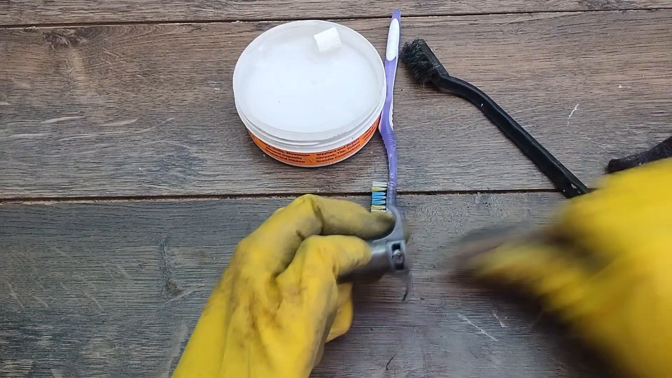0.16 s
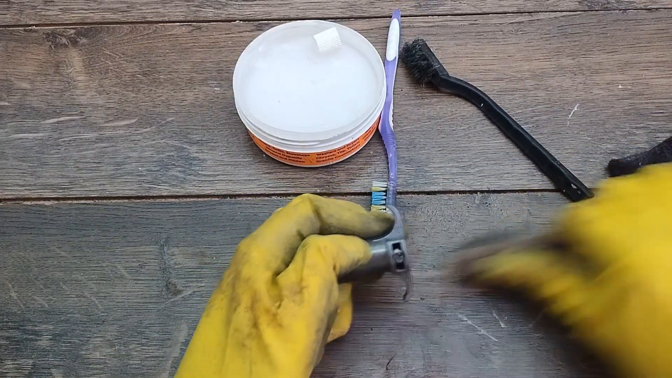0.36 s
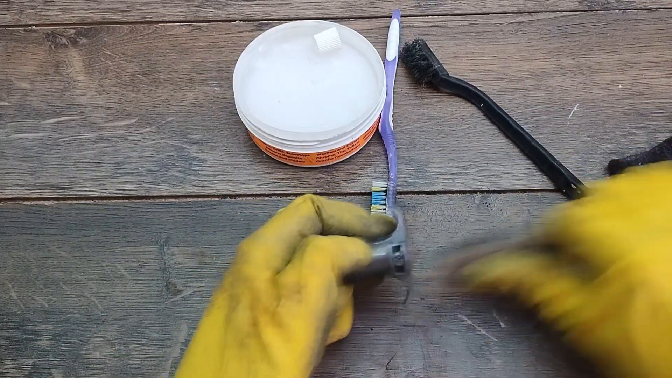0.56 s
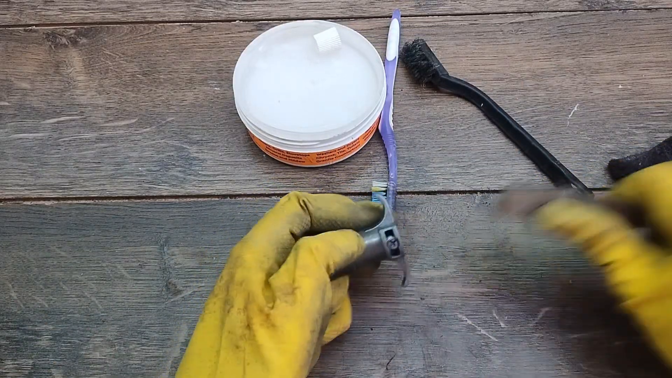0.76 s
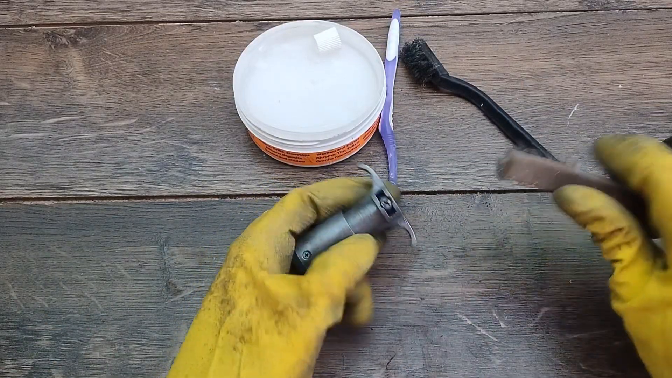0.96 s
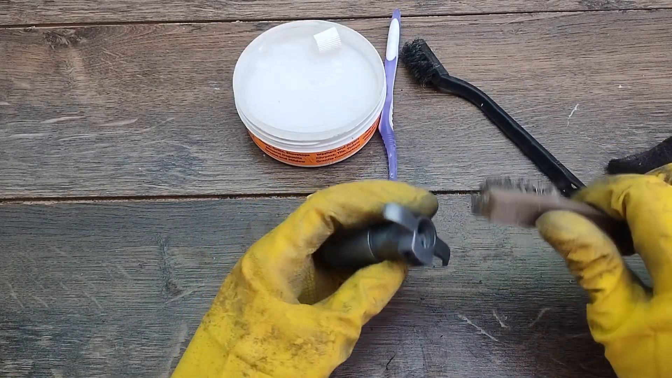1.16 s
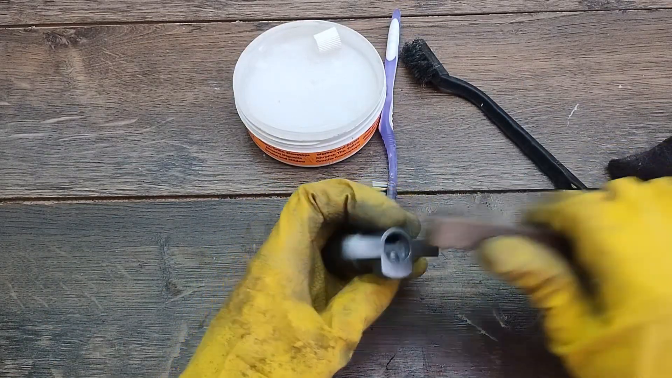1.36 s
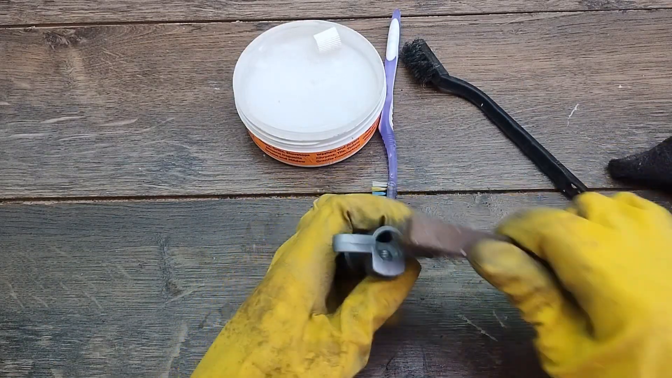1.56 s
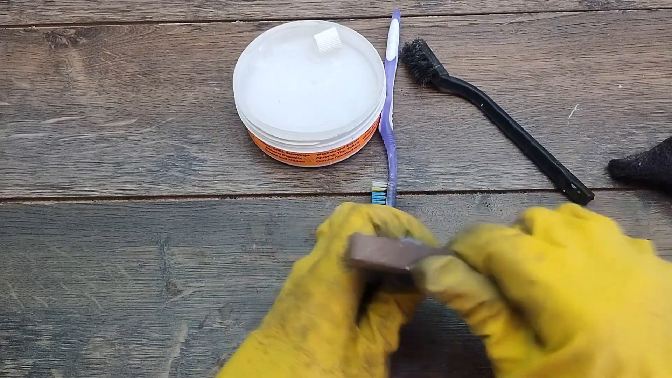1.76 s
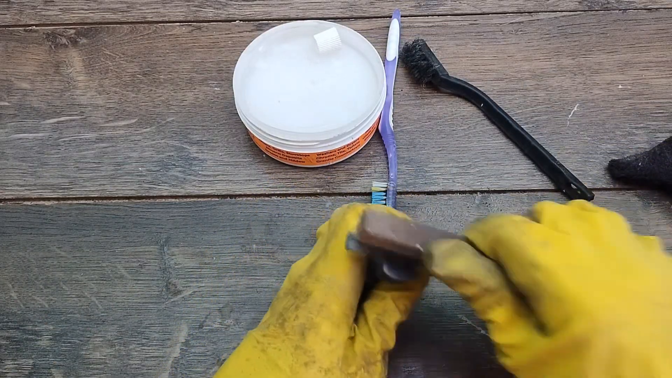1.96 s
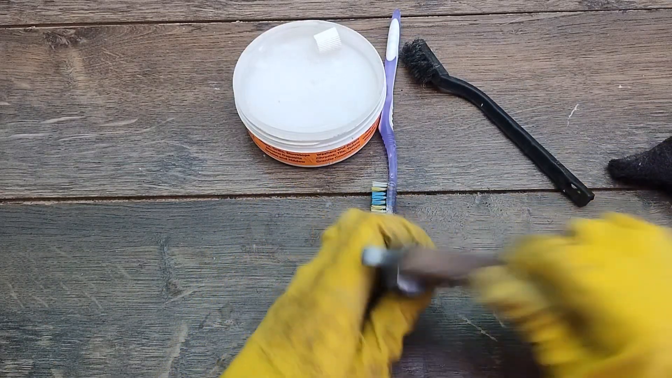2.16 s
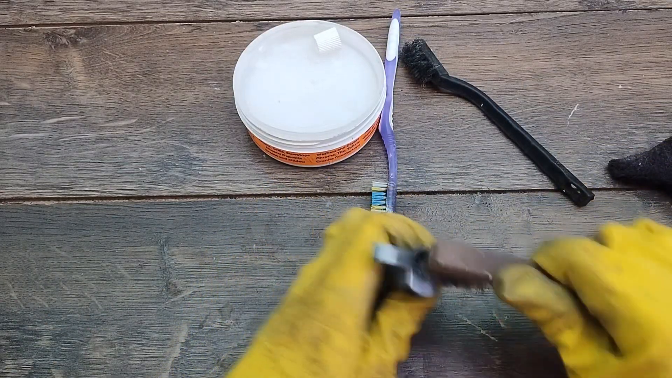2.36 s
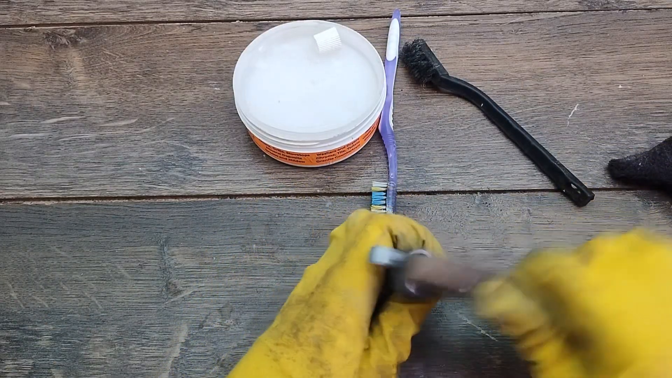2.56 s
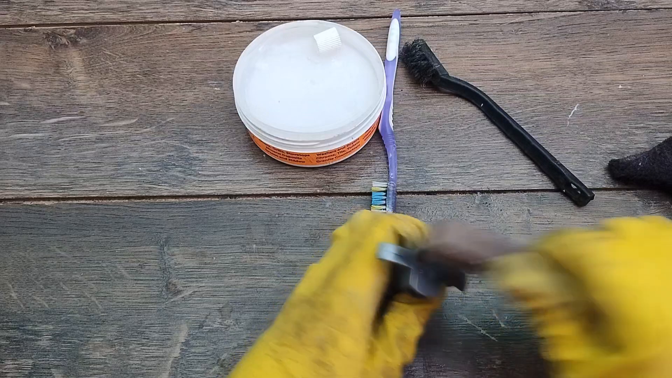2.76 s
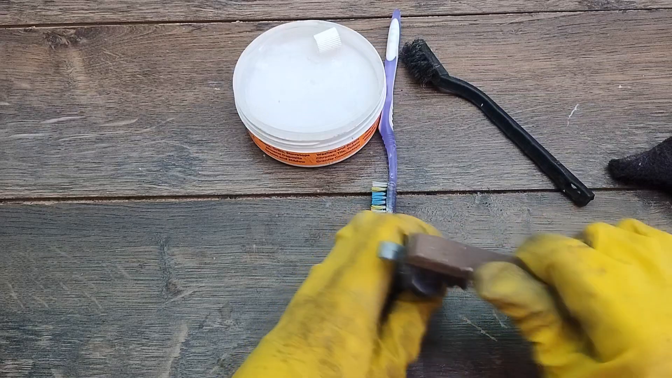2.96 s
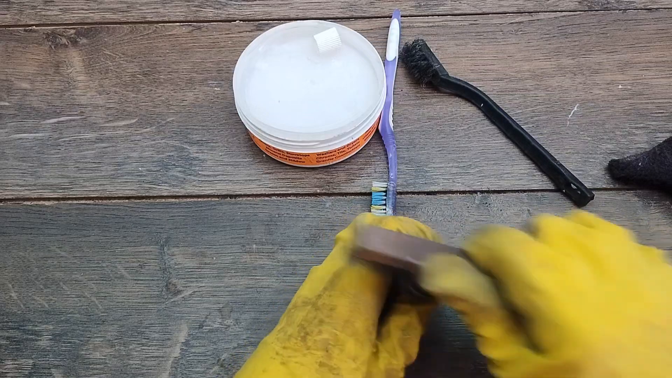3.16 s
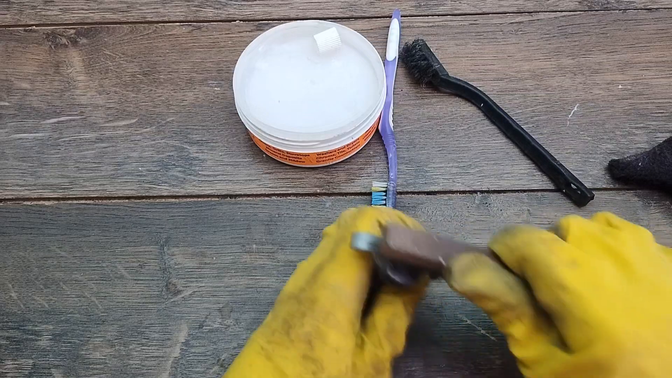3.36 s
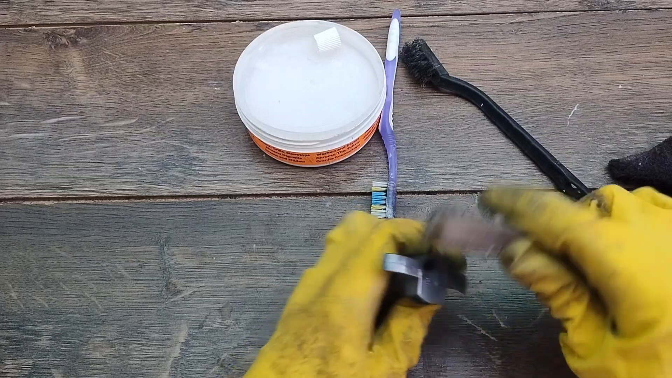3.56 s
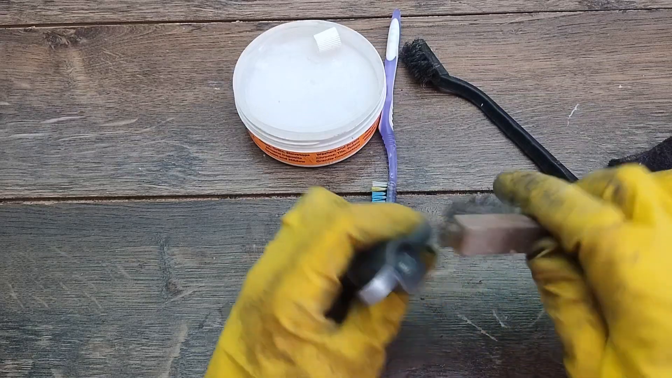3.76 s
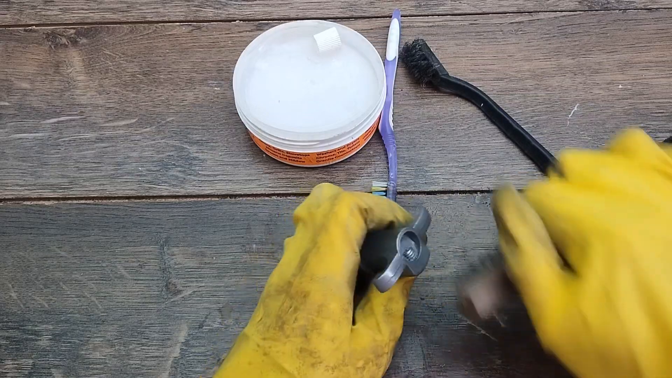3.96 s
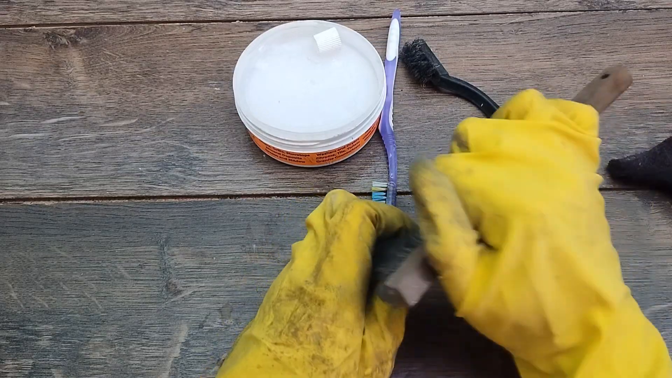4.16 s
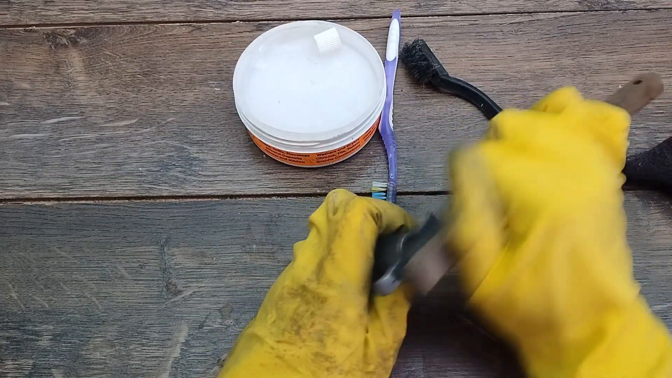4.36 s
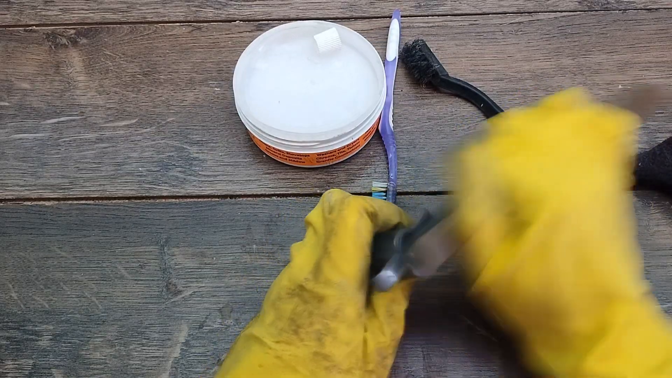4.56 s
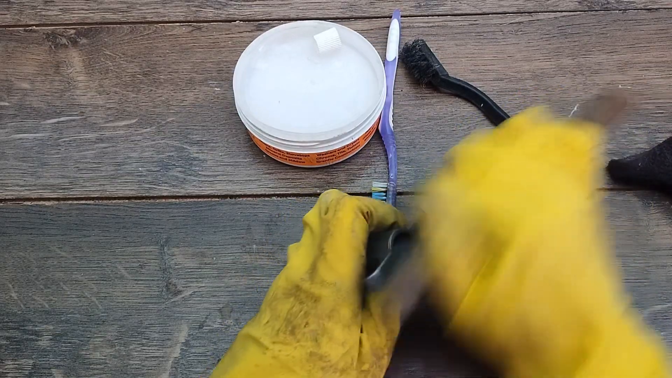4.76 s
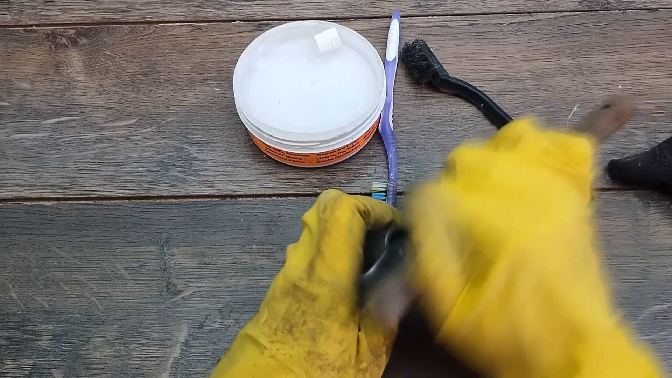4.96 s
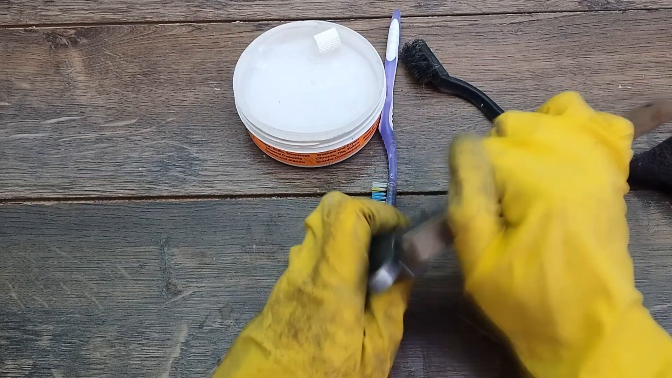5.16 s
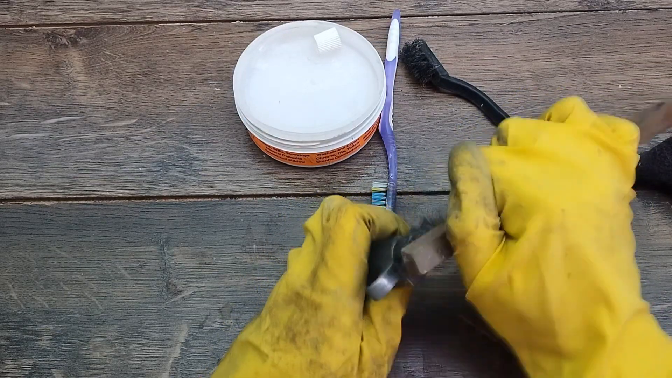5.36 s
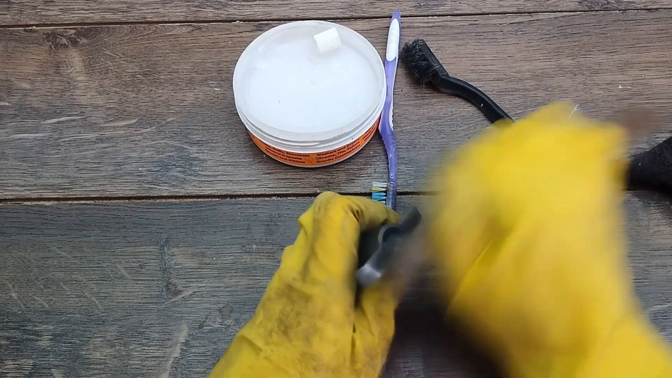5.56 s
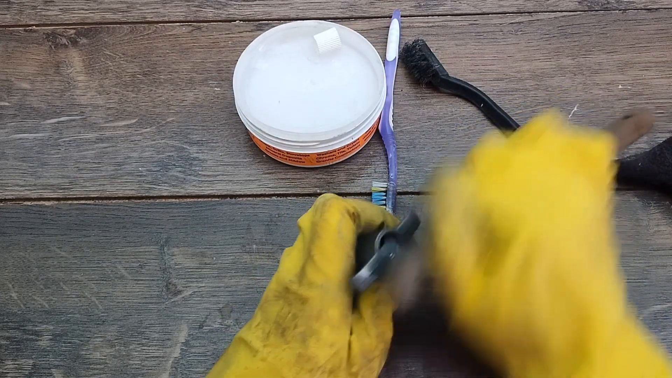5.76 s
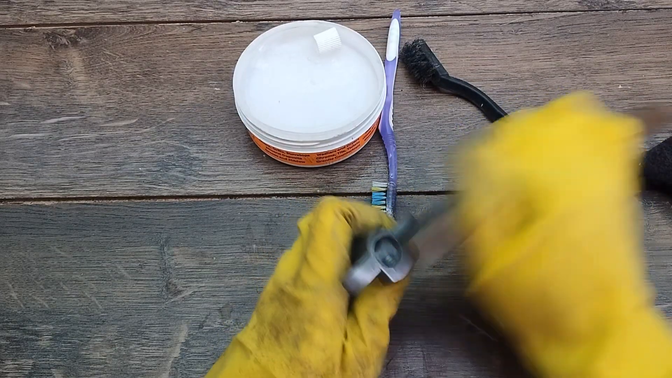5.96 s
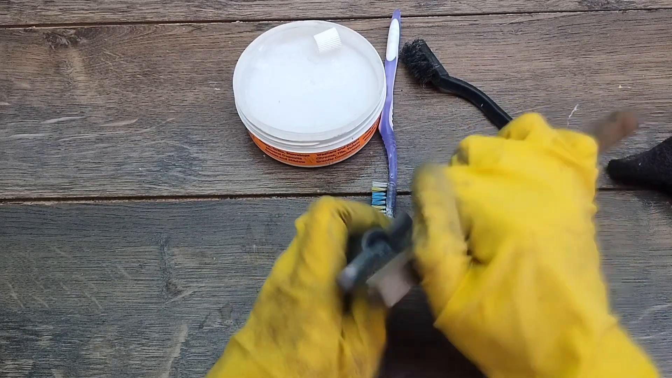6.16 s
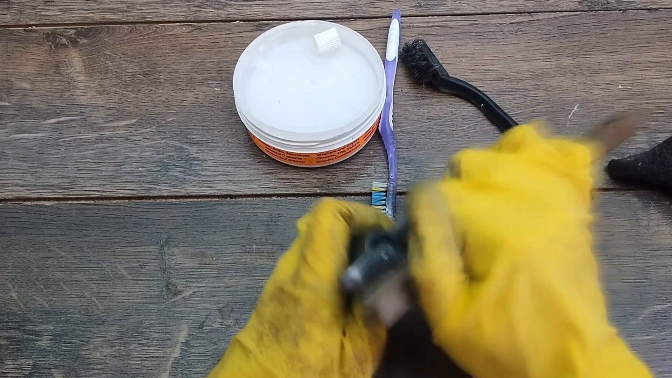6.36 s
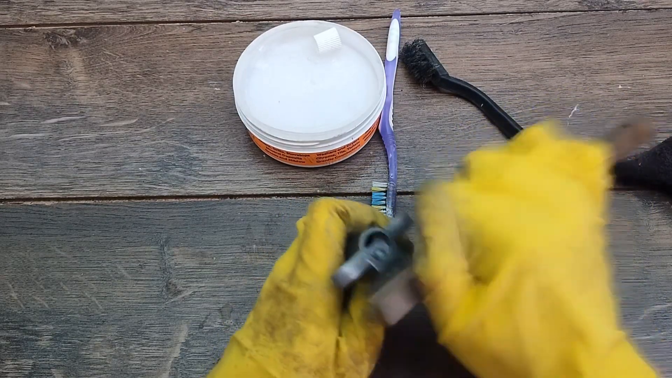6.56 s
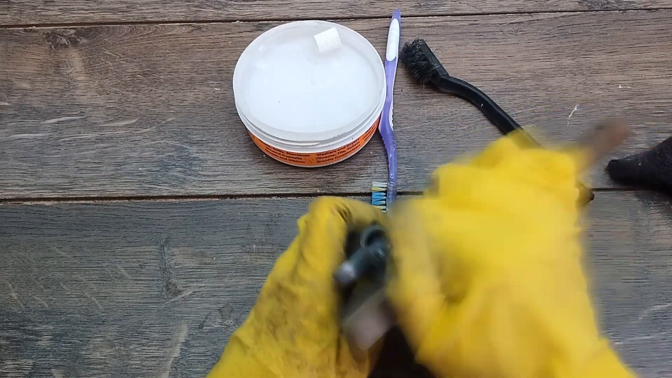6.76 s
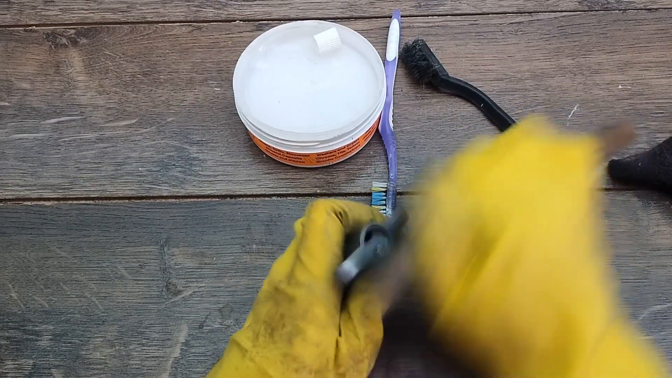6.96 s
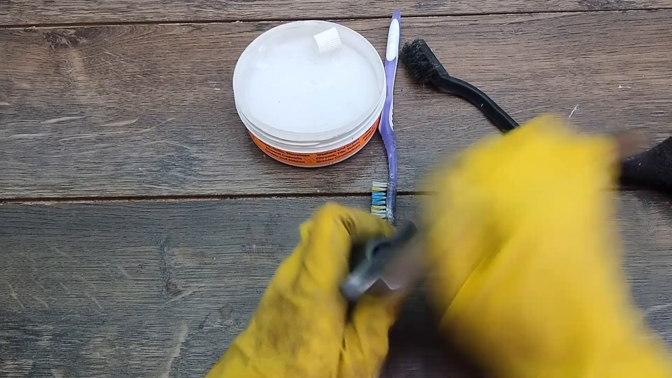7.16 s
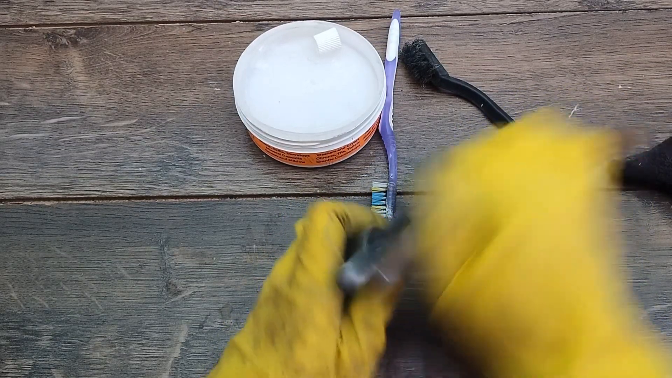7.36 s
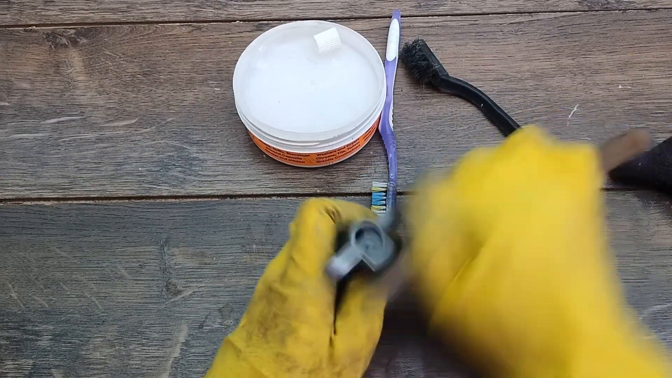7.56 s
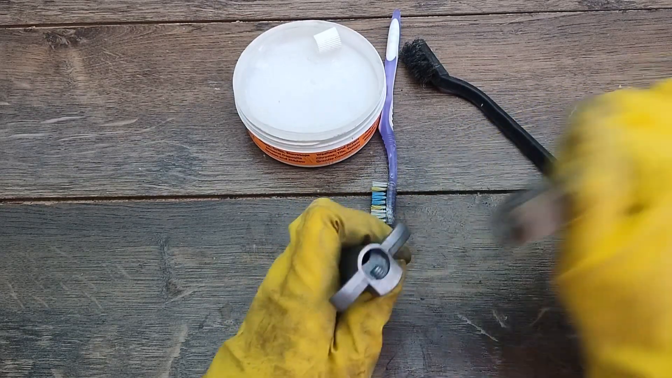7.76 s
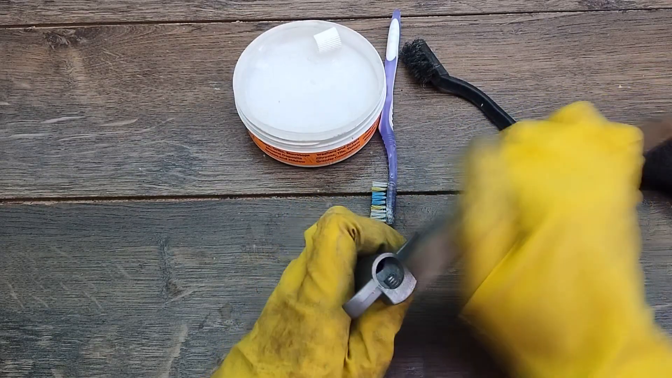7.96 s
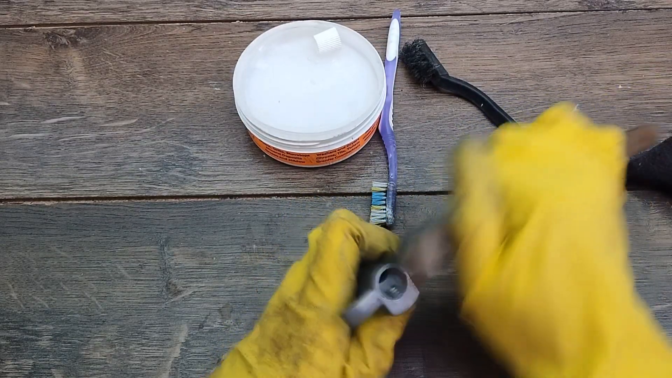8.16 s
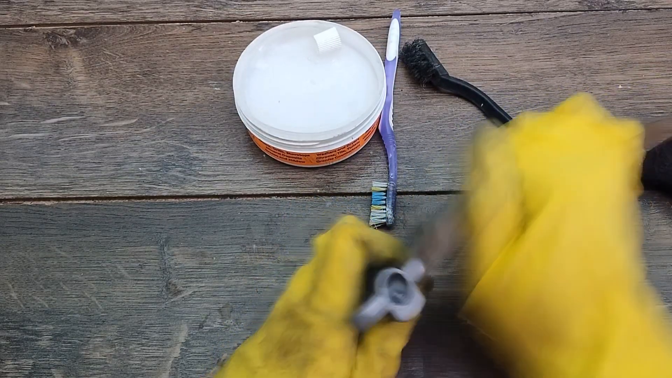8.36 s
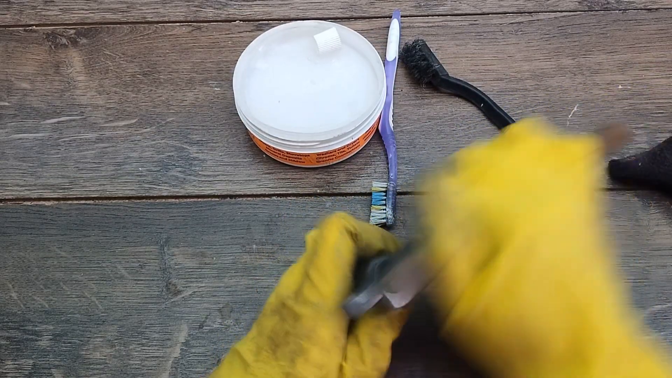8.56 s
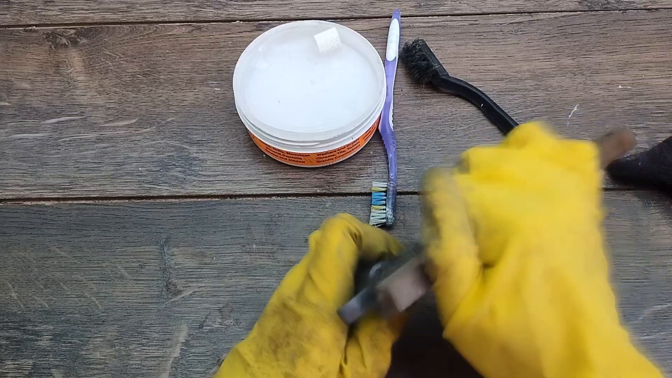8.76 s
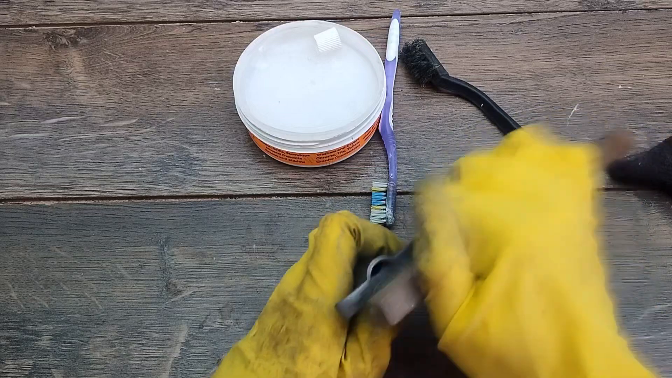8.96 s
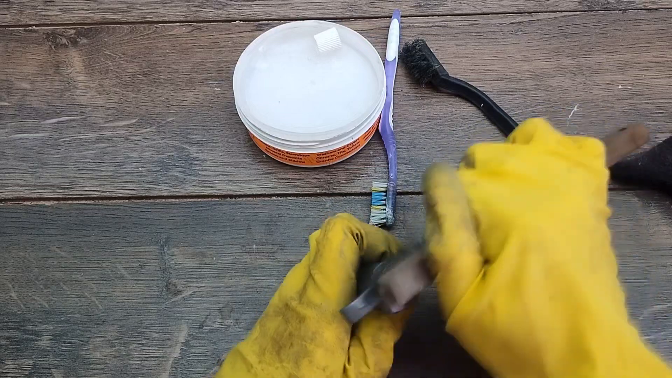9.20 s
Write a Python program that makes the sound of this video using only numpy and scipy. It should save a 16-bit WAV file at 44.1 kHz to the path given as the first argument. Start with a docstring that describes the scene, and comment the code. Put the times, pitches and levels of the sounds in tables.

```python
"""First come four strong swipes of a hand wire brush on a small steel part, over the low rush of a quiet room.
A rubber glove holds the part just above a wooden table; lighter strokes follow, then quick to-and-fro scrubbing.
Wire tips hiss and bent wires rasp as random clicks; tufts catch on edges and knock in the brush block.
At a few hard strokes the brush skids off: the part rings briefly through its modes.
The hands bump the table as soft filtered noise, and two microphones hear it all with a faint room tail."""
import sys
import numpy as np
from scipy import signal
from scipy.fft import rfft, irfft
from scipy.io import wavfile
from scipy.ndimage import uniform_filter1d

SR = 44100
rng = np.random.default_rng(int(sys.argv[2]) if len(sys.argv) > 2 else 0)


def unload_audio(sound):
    """Save the sound as a 16-bit wav file, at the path given as the first command line argument."""
    columns = np.transpose(np.atleast_2d(sound))
    # keep every value between -1 and 1, then stretch to whole-number steps
    steps = np.round(np.clip(columns, -1, 1) * 32767)
    wavfile.write(sys.argv[1], SR, steps.astype(np.int16))


N = 407043
TIME = np.arange(N) / SR

# Levels in the tables are relative: the gains of each source come on top.
# the brush skids off an edge, the block knocks, the steel rings, the last tuft snaps:
# (t/s, knock level/dB, ring level/dB, snap level/dB, fade to 1/e /s)
SKIDS = [(.025, -42, -42, -36, 0.0044), (0.243, -40.5, -42.5, -31, 0.0028), (.458, -42, -44, -36, 0.0034),
         (.6615, -29, -41.5, -18.5, 0.0046), (5.968, -47, -55, -43, 0.014),
         (7.092, -55, -50.5, -21.5, 0.0038), (7.666, -31.5, -35.5, -28, 0.0084)]
# colour of biting wires at the two microphones: (f/Hz, left level/dB, right level/dB)
RASP_COLOUR = [(400, -3, -10.5), (1110, -9, -22.5), (1320, -12, -6), (1674, -3.5, 0), (1950, -13, -16.5),
               (2430, -4.5, -2.5), (3130, 5.5, 0), (3300, 2, 0.5), (3540, 0.5, -3.5), (3900, -1, -3),
               (5120, -12, 1.5), (7560, -7, -7), (15000, -19.5, -55)]


def from_db(db):
    """Amplitude ratio for a level in dB."""
    return np.exp(np.asarray(db) * (np.log(10) / 20))


def rms_one(x):
    """Scale to an rms of 1."""
    return x / np.sqrt(np.mean(x ** 2) + 1e-20)


def swells(rows, attack_shape=0.76, release_shape=0.91):
    """Level of contacts (peak s, dB, rise s, fall s to 1/e; higher shape is squarer); their powers add."""
    power = np.zeros(N)
    for s, db, rise, fall in rows:
        near = slice(max(0, int((s - .12) * SR)), int((s + .12) * SR))
        lag = TIME[near] - s
        span = np.where(lag < 0, rise, fall)
        shape = np.where(lag < 0, attack_shape, release_shape)
        fade = np.abs(lag / span) ** shape
        power[near] += from_db(db) ** 2 * np.exp(-2 * np.minimum(fade, 20))
    return np.sqrt(power)


def flutter(per_s, depth_db):
    """A gain that wanders at random about its mean power; rms 1."""
    knots = np.arange(0, N / SR + 1, 1 / per_s)
    gains = from_db(depth_db * rng.standard_normal(len(knots)))
    return rms_one(np.interp(TIME, knots, gains))


def slips(per_s, spread_db):
    """Wires let go at random moments, each with a click of random sign and size; rms 1."""
    chance = per_s / SR
    sizes = from_db(spread_db * np.minimum(rng.standard_normal(N), 2))
    clicks = sizes * np.sign(rng.random(N) - .5)
    happens = rng.random(N) < chance
    # dividing by the root of the chance keeps the power even when the rate changes
    return rms_one(clicks * happens / np.sqrt(chance))


def colour(x, points):
    """Causal (minimum-phase) filter for each microphone; keeps white noise's power, averaged over both."""
    size = 4096
    hz, *sides = np.transpose(points)
    grid = np.log(np.maximum(np.fft.rfftfreq(size, 1 / SR), 1))
    gains = from_db([np.interp(grid, np.log(hz), db) for db in sides])
    # folding the cepstrum onto positive time gives the minimum phase
    cepstrum = irfft(np.log(gains))
    cepstrum[:, 1:size // 2] *= 2
    cepstrum[:, size // 2 + 1:] = 0
    response = rms_one(irfft(np.exp(rfft(cepstrum)))) / np.sqrt(size)
    return signal.oaconvolve(np.atleast_2d(x), response, axes=1)[:, :N]


def resonance(x, hz, width_hz):
    """One mode as a two-pole filter, gain 1 at its top."""
    r = np.exp(-np.pi * width_hz / SR)
    feed = np.array([1, 0, -1]) * (1 - r * r) / 2
    return signal.lfilter(feed, [1, -2 * r * np.cos(2 * np.pi * hz / SR), r * r], x)


def stroke(s, db, length, bite_db):
    """A stroke centred on s swells and fades: (peak s, dB, rise s, fall s, bite dB)."""
    rise = length * 0.56   # share of the stroke spent swelling
    return s - length / 2 + rise, db, rise, length - rise, bite_db


def drag():
    """Level of the wires that stay on the part between strokes, or graze it while it is turned."""
    # wires resting on the part: (from t/s, to t/s, drag level/dB)
    contacts = [(.01, 1.2, -77.5), (1.725, 2.1, -64.5), (2.095, 2.809, -63), (2.878, 3.512, -66),
                (3.51, 4.263, -72.5), (4.271, 6.083, -63.5), (6.164, 7.7, -63.5), (7.937, 9.3, -65.5)]
    settle_s = 0.018   # time the wires take to settle or lift
    level = sum(from_db(db) * ((TIME >= start) & (TIME < end)) for start, end, db in contacts)
    return uniform_filter1d(level, size=int(settle_s * SR))


def glove_echo(x):
    """The moving gloves throw back an early echo whose delay wanders, so the colour of the strokes varies."""
    share = .27
    knots = np.arange(0, N / SR + 1, .12)
    echoes = []
    for side in x:
        lag = np.interp(TIME, knots, rng.uniform(.0005, .0016, len(knots)))
        echoes.append(np.interp(TIME - lag, TIME, side))
    return (x + share * np.array(echoes)) / np.hypot(1, share)


def wire_rings(level, count, width_hz):
    """Single wires sing briefly, each at its own pitch, plucked with its own random flutter."""
    rings, plucks = np.zeros((2, N)), rng.standard_normal(N) * level
    pitches = np.geomspace(4800, 13800, count) * rng.uniform(.96, 1.04, count)
    for k, hz in enumerate(pitches):
        gain = np.minimum(flutter(per_s=30, depth_db=11.5), 2)
        rings[k % 2] += resonance(plucks * gain, hz, width_hz)   # alternate microphones
    return rms_one(rings) * np.sqrt(np.mean(level ** 2))


def wire_tips(strokes, tufts):
    """Thousands of tiny slips hiss, denser in a stronger stroke; each microphone hears its own."""
    # colour of the tip hiss at the two microphones: (f/Hz, left level/dB, right level/dB)
    hiss_colour = [(1540, -25.5, -32), (4000, -15, -16.5), (4800, -9, -13.5), (5870, -10, -0.5),
                   (7240, -21, -2.5), (8210, -15.5, 5), (10730, -11.5, 5), (13700, -16.5, -1.5),
                   (13960, -29, -11.5)]
    stroke_level = swells([row[:4] for row in strokes], attack_shape=3.35, release_shape=2.16)
    level = np.hypot(stroke_level, drag())
    per_s = 3009.5 + 22000 * level / level.max()
    clicks = np.array([slips(per_s, spread_db=0.0) for side in range(2)])
    rings = from_db(-14.5) * wire_rings(level, count=12, width_hz=79)
    hiss = colour(clicks * level * tufts + rings, hiss_colour)
    return from_db(-1.0) * glove_echo(hiss)


def steel(force):
    """The modes of the part, damped by the glove, ring side by side."""
    # modes of the steel part: (f/Hz, width/Hz, level/dB)
    steel_modes = [(1182, 76, 11.5), (1590, 50, -30), (1750, 190, -20), (2170, 300, 0), (2690, 120, 1),
                   (2870, 46, 11.5), (3135, 174, 7), (3500, 30, -10), (4150, 29, -30), (4200, 27, 1),
                   (4780, 86, -24), (5350, 580, -15), (5950, 150, -8)]
    return sum(from_db(db) * resonance(force + 1e-18, hz, width) for hz, width, db in steel_modes)


def bent_wires(strokes, tufts):
    """Wires that bite bend and spring back with a lower, grittier rasp, which the steel takes up."""
    bites = [(s, db + bite_db, rise, fall) for s, db, rise, fall, bite_db in strokes]
    biting = swells(bites, attack_shape=2.6, release_shape=1.5)
    level = np.hypot(biting, from_db(5.0) * drag())
    shared = slips(3500, spread_db=4)
    own = np.array([slips(5000, spread_db=6) for side in range(2)])
    force = rms_one(.5 * shared + own) * level * tufts
    rasp = glove_echo(colour(force, RASP_COLOUR))
    return from_db(-5.5) * rasp + from_db(-8.5) * steel(force)


def snaps():
    """One sharp push, a single sample long, as the last tuft of each skid lets go."""
    pushes = np.zeros(N)
    for s, knock_db, ring_db, snap_db, fade in SKIDS:
        pushes[int(s * SR)] = from_db(snap_db)
    return pushes


def brush_block(catches):
    """A caught tuft lets go in a short volley of slips that knock in the block and its side resonances."""
    # colour of the knock at the two microphones: (f/Hz, left level/dB, right level/dB)
    block_colour = [(25, -46, -43), (58.3, -23, -20), (122, -9, -5.5), (374, -5.5, -7.5),
                    (458, -14.5, -11.5), (850, -12, -14), (998, -22, 1), (1118, 5, 5.5), (1358, 2, 1),
                    (1530, -10, -9.5), (1850, -39, -20.5), (3100, 0.5, -19.5), (3950, -43, -31),
                    (9000, -67, -13)]
    # side resonances of the block, struck unevenly from tuft to tuft: (f/Hz, width/Hz, level/dB)
    side_modes = [(1028, 98, -7), (1353, 160, -5.5)]
    shared = slips(2200, spread_db=-1.0)
    own = np.array([slips(2500, spread_db=0.0) for side in range(2)])
    level = swells(catches, attack_shape=1.6, release_shape=1.3)
    force = rms_one(shared + .5 * own) * level + from_db(5.0) * snaps()
    ringing = np.zeros((2, N))
    for hz, width, db in side_modes:
        uneven = flutter(per_s=16, depth_db=6)
        ringing += from_db(db) * resonance(force * uneven + 1e-18, hz, width)
    return from_db(-1.0) * colour(force, block_colour) + from_db(7.5) * ringing


def steel_part():
    """Wires snapping over an edge strike the part: a crack and a short ring."""
    rise_s, late = 0.004, 0.68   # swell of the ring; it peaks this share of its fade after the skid
    rows = [(s + late * fade, ring_db, rise_s, fade) for s, knock_db, ring_db, snap_db, fade in SKIDS]
    level = swells(rows)
    clicks = np.array([slips(3000, spread_db=4) for side in range(2)]) * level
    return from_db(16.5) * steel(clicks) + from_db(-6.0) * colour(snaps(), RASP_COLOUR)


def table(strokes, catches):
    """Gloved bumps rumble in the boards; strokes shake them through the resting hand, catches rock them."""
    # colour of the boards at the two microphones: (f/Hz, left level/dB, right level/dB)
    board_colour = [(30, -18, -6), (69.5, -8, -7.5), (127, 0, 0.5), (200, -4.5, -3), (378, -7, -6.5),
                    (520, -21.5, -21), (1220, -19.5, -13.5), (1760, -23.5, -20.5), (3000, -45, -29),
                    (7000, -73, -48)]
    # the hands bump the table: (t/s, level/dB, length/s as rise plus fall)
    bump_rows = [(0.016, -47, 0.047), (0.25, -47.5, 0.024), (0.314, -47, .013), (.742, -49, 0.016),
                 (6.561, -47.5, 0.03), (6.914, -43.5, .024), (6.952, -43, 0.011), (7.414, -46, 0.026),
                 (7.475, -46.5, .026), (7.705, -40.5, 0.051), (7.762, -46.5, 0.059), (7.814, -43.5, 0.027),
                 (8.77, -49.5, 0.065), (8.839, -47.5, 0.042)]
    rise_share = .42
    high = signal.butter(1, 600, "high", fs=SR, output="sos")
    own = signal.sosfilt(high, rng.standard_normal((2, N)))
    rumble = colour(rng.standard_normal(N) + 0.66 * own, board_colour)
    rumble /= np.sqrt(uniform_filter1d(np.mean(rumble ** 2, axis=0), size=900))   # even out its level
    shake = from_db(-17.0) * swells([row[:4] for row in strokes])
    bumps = swells([(s, db, length * rise_share, length * (1 - rise_share)) for s, db, length in bump_rows])
    # the arm's weight rocks the whole table, deep and alike on both sides
    deep = signal.butter(2, [35, 95], "band", fs=SR, output="sos")
    rocking = rms_one(signal.sosfilt(deep, rng.standard_normal(N)))
    rocking = rocking * np.minimum(swells(catches), from_db(-50))
    return from_db(-2.5) * rumble * np.hypot(bumps, shake) + from_db(-18.0) * rocking


def room(x, t60, wet_db, dull_hz):
    """A faint, dull tail of dense reflections: decaying noise, different at each microphone."""
    lag = TIME[:SR // 3]
    tail = rng.standard_normal((2, len(lag))) * from_db(-60 * lag / t60) * (lag > .004)
    low = signal.butter(1, dull_hz, fs=SR, output="sos")
    tail = signal.sosfilt(low, rms_one(tail) / np.sqrt(len(lag)))
    return from_db(wet_db) * signal.oaconvolve(x, tail, axes=1)[:, :N]


def room_noise():
    """A steady low rush with a few humming resonances, nearly alike at both microphones in the bass."""
    # colour of the rush at the two microphones: (f/Hz, left level/dB, right level/dB)
    rush_colour = [(20.1, -19, -13), (56.5, -9, -4.5), (115, 3.5, 5), (185, -4.5, 0.5), (246, 4.5, 6.5),
                   (304, -0.5, -2), (335, 4, 6.5), (398, -5, -0.5), (910, -7, -7.5), (1130, -7.5, -4),
                   (1480, -12.5, -12), (2580, -10.5, -13), (5400, -26, -22), (14400, -32, -26.5)]
    # low resonances of the room: (f/Hz, width/Hz, level/dB)
    hum_modes = [(117, 22, -4), (243, 20, -1), (367, 22, 0)]
    shared, own = rng.standard_normal(N), rng.standard_normal((2, N))
    treble = signal.sosfilt(signal.butter(1, 1000, "high", fs=SR, output="sos"), own)
    bass = signal.sosfilt(signal.butter(1, 1000, fs=SR, output="sos"), shared + .17 * own)
    hum = np.zeros(N)
    for hz, width, db in hum_modes:
        once = resonance(rng.standard_normal(N), hz, width)
        hum += from_db(db) * resonance(once, hz, width)
    return from_db(-63) * colour(bass + treble, rush_colour) + from_db(-70.5) * rms_one(hum)


def swings():
    """The arm swings evenly through each run, and one direction bites more: times and extra bite in dB."""
    # runs of to-and-fro scrubbing:
    # (first stroke t/s, last stroke t/s, rate/strokes per s, extra bite of the first direction/dB)
    runs = [(4.319, 4.66, 17.7, -3), (4.712, 4.877, 18.1, 3), (4.927, 5.124, 20.3, 1.5),
            (5.166, 5.446, 21.4, -2), (5.513, 6.022, 19.6, 3), (6.198, 6.753, 19.9, -1),
            (6.797, 7.037, 20.6, -1), (7.09, 7.617, 20.8, -2), (7.985, 8.534, 20.1, 1.5),
            (8.62, 8.891, 18.8, 1.5), (8.951, 9.226, 18.5, 0.3)]
    s, lean_db = [], []
    for first, last, per_s, push_db in runs:
        count = int(round((last - first) * per_s)) + 1
        s.extend(np.linspace(first, last, count))
        lean_db.extend(push_db * (-1) ** np.arange(count))   # the other direction bites less
    return np.array(s), np.array(lean_db)


def scrubbing():
    """Each swing makes one stroke and one catch; the arm's force sets both, and a harder catch bites more."""
    # force of the scrubbing arm: (t/s, tip hiss level/dB, knock level of catching tufts/dB)
    effort = [(4.32, -49.5, -76.5), (4.45, -47.5, -67.5), (4.6, -43, -50.5), (4.85, -42.5, -48.5),
              (5.15, -44.5, -47), (5.45, -45.5, -44.5), (5.65, -40.5, -47), (5.87, -45.5, -44.5),
              (6.021, -45, -46), (6.24, -47, -52), (6.4, -47.5, -54.5), (6.52, -41.5, -47.5),
              (6.72, -49.5, -52), (6.85, -44.5, -45), (7.15, -40.5, -45.5), (7.35, -44.5, -52.5),
              (7.5, -41.5, -45), (7.62, -43.5, -42.5), (7.98, -51.5, -59), (8.1, -47.5, -56.5),
              (8.23, -50, -62), (8.33, -44, -52), (8.48, -44.5, -55), (8.59, -55, -63.5), (8.68, -44, -55),
              (8.8, -44, -73), (8.95, -49, -66), (9.16, -42, -58), (9.22, -46.5, -56)]
    # strokes that dig in or glance off: (t/s, change of force/dB)
    accents = [(4.43, 5), (5.17, -6), (5.92, -3.5), (5.97, 7), (6.25, 4), (6.3, -14), (6.45, -6),
               (6.75, -2.5), (6.8, 4), (6.89, 3), (6.99, -7.5), (7.09, 3.5), (7.13, -5.5), (7.47, 1),
               (7.57, -3.5), (8.04, 5), (8.38, -9.5), (8.43, 1.5), (8.84, 4), (8.89, -4.5)]
    # tufts that snag hard on an edge, in place of the stroke's ordinary catch: (t/s, knock level/dB)
    snags = [(4.596, -48), (4.71, -46.5), (4.788, -48), (4.887, -40.5), (5.021, -41.5), (5.093, -45),
             (5.122, -42), (5.21, -44.5), (5.296, -48.5), (5.502, -44), (5.669, -40.5), (5.712, -44),
             (5.972, -37), (6.51, -48), (6.649, -45), (6.9, -38.5), (7.032, -44.5), (7.092, -40.5),
             (7.231, -40), (7.329, -41.5), (7.389, -38.5), (7.477, -41.5), (7.529, -39.5), (8.041, -46),
             (8.441, -46.5), (8.779, -47.5), (8.814, -52.5)]
    length_s = 0.036   # rise plus fall of a scrubbing stroke
    bite_base_db, bite_follows = -5, 0.45   # rasp over hiss when knock equals hiss; dB more per dB of knock
    catch_rise_s, catch_fall_s = 0.012, 0.011
    late_s, scatter_s, scatter_db = 0.0022, 0.0023, 2.5   # catch after mid-stroke, and how it varies

    s, lean_db = swings()
    accent_db = np.zeros(len(s))
    for when, db in accents:
        accent_db[np.argmin(np.abs(s - when))] += db
    times, *levels = np.transpose(effort)
    hiss_db, knock_db = [np.interp(s, times, db) + accent_db for db in levels]
    late, hard = rng.standard_normal((len(s), 2)).T
    catch_s = s + late_s + scatter_s * late
    catch_db = knock_db + scatter_db * hard
    for when, db in snags:
        nearest = np.argmin(np.abs(s - when))
        catch_s[nearest], catch_db[nearest] = when, db
    bite_db = bite_base_db + bite_follows * (catch_db - hiss_db) + lean_db
    strokes = [stroke(t, db, length_s, bite) for t, db, bite in zip(s, hiss_db, bite_db)]
    catches = [(t, db, catch_rise_s, catch_fall_s) for t, db in zip(catch_s, catch_db)]
    return strokes, catches


def scene():
    """The tufts pass over the part one after another, so hiss and rasp flutter together."""
    # single strokes, the swipes first: (centre t/s, tip hiss level/dB, length/s, bite = rasp over hiss/dB)
    single_strokes = [(0.009, -36.5, 0.058, -5), (0.178, -58.5, 0.019, -1), (0.207, -45, 0.025, -4),
                      (0.234, -34.5, 0.045, -4.5), (0.408, -48.5, 0.05, -3), (0.436, -36.5, 0.054, -7),
                      (0.646, -35.5, 0.051, -3.5), (1.828, -56, 0.041, -12), (1.89, -47, 0.028, -7),
                      (1.92, -46.5, 0.051, -9), (2.006, -44, 0.031, -5.5), (2.123, -49, 0.055, -4),
                      (2.187, -43.5, 0.039, -5.5), (2.292, -43, 0.028, -6.5), (2.355, -47, 0.052, -4),
                      (2.407, -51, .022, -11), (2.454, -49, 0.02, -11), (2.524, -41, 0.04, -6.5),
                      (2.544, -46, 0.049, -3), (2.62, -43, 0.056, -4), (2.674, -51.5, 0.025, -4),
                      (2.716, -51, 0.023, -12), (2.905, -46, 0.061, -6), (2.995, -48.5, 0.035, -5.5),
                      (3.084, -49, 0.04, -5), (3.192, -60, 0.055, 3.5), (3.265, -48, .043, -4.5),
                      (3.376, -51.5, 0.069, -2), (3.447, -48, 0.037, -5), (3.482, -47.5, 0.012, 1),
                      (3.919, -58, .042, 5.5), (4.22, -55, 0.051, -6), (6.157, -52.5, 0.022, -1.5),
                      (7.678, -35, 0.041, 7.5)]
    skid_rise_s = 0.0079   # swell of the knock
    scrub_strokes, scrub_catches = scrubbing()
    strokes = [stroke(*row) for row in single_strokes] + scrub_strokes
    skid_catches = [(s, knock_db, skid_rise_s, fade) for s, knock_db, ring_db, snap_db, fade in SKIDS]
    catches = skid_catches + scrub_catches
    tufts = flutter(per_s=220, depth_db=2.5)
    work = wire_tips(strokes, tufts) + bent_wires(strokes, tufts)
    work = work + brush_block(catches) + steel_part() + table(strokes, catches)
    return work + room(work, t60=0.64, wet_db=-22.0, dull_hz=5900) + room_noise()


def record(dry):
    """The top is cut steeply above 14.4 kHz."""
    return signal.sosfilt(signal.ellip(10, .1, 70, 14400, fs=SR, output="sos"), dry)


dry = scene()
out = record(dry)
unload_audio(out)
```